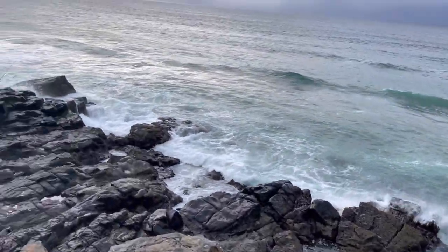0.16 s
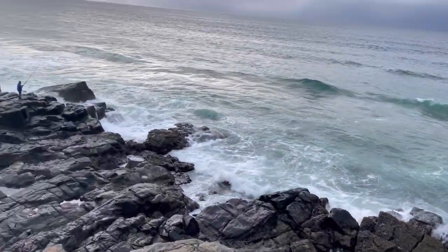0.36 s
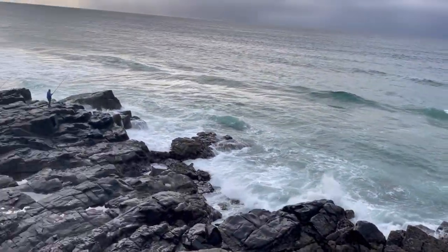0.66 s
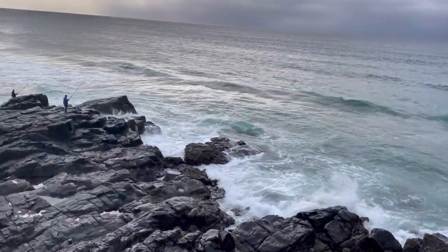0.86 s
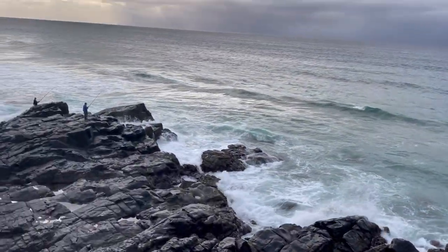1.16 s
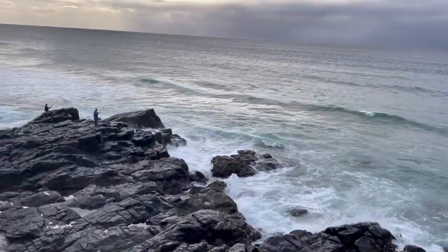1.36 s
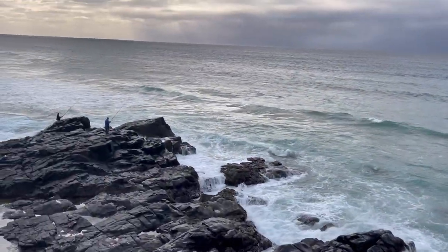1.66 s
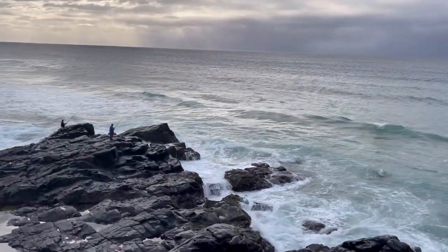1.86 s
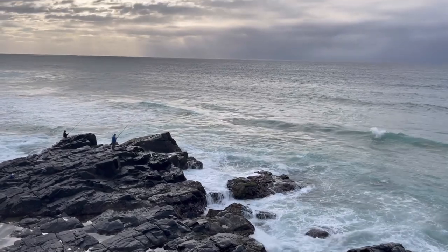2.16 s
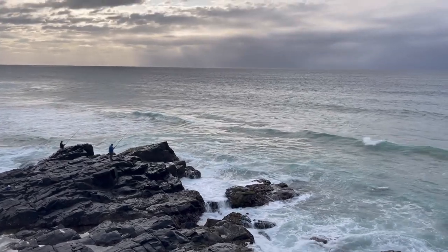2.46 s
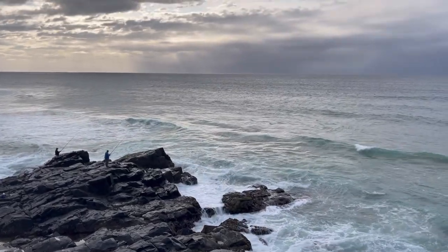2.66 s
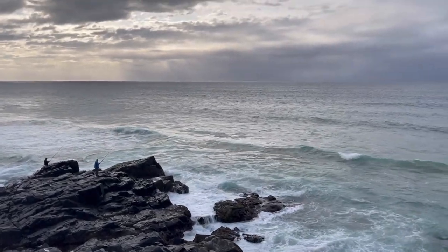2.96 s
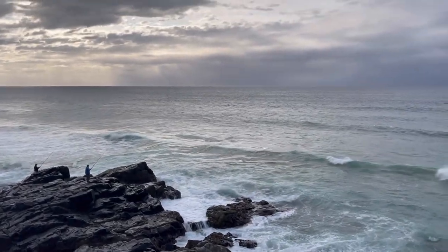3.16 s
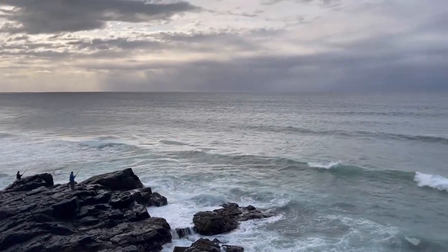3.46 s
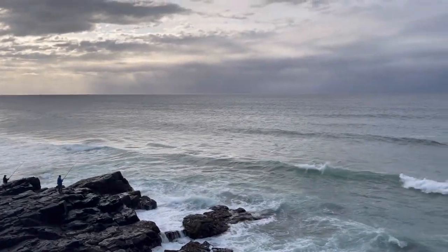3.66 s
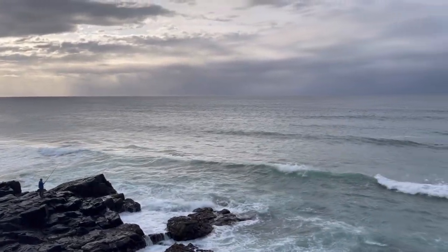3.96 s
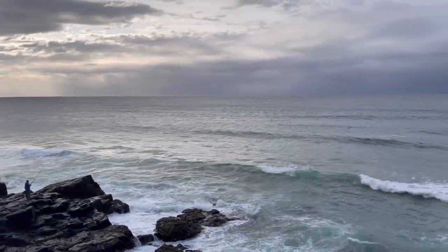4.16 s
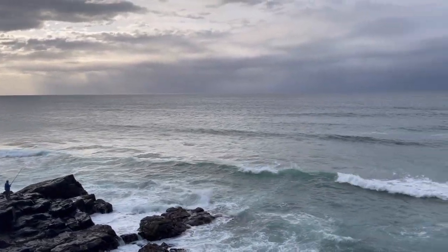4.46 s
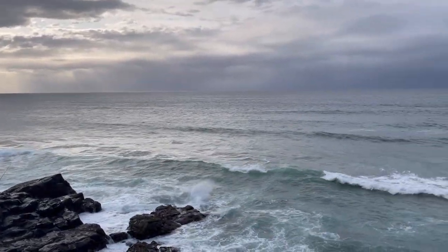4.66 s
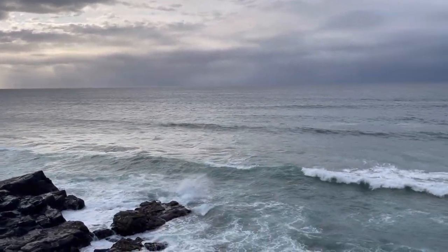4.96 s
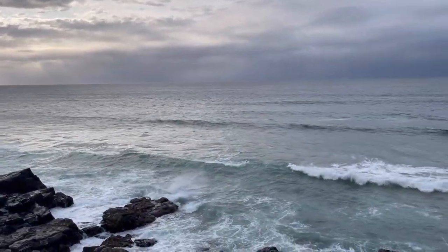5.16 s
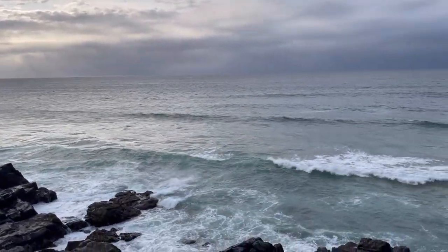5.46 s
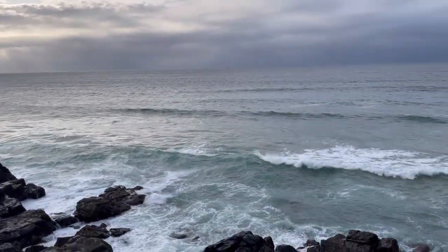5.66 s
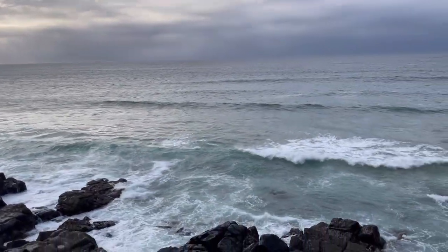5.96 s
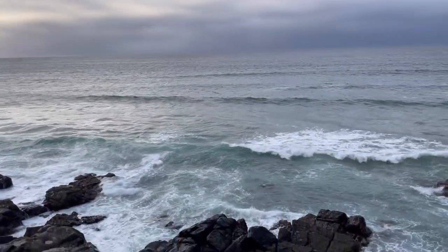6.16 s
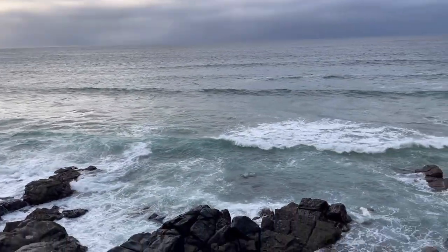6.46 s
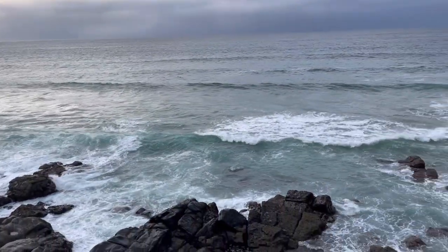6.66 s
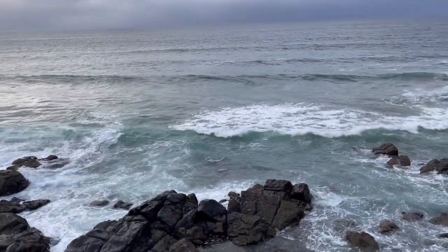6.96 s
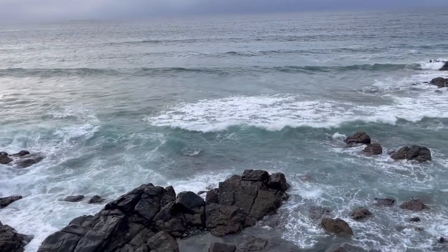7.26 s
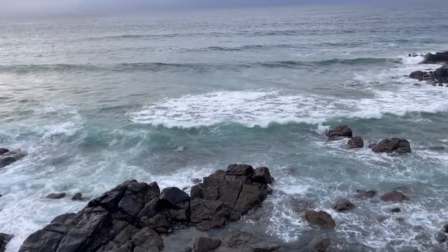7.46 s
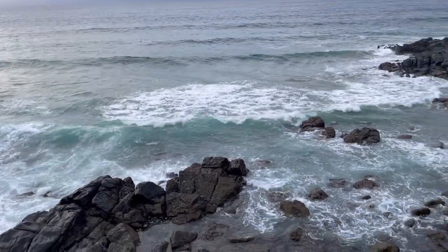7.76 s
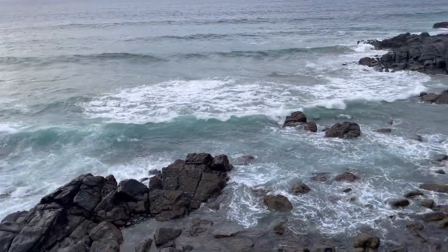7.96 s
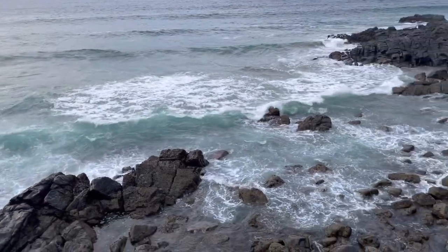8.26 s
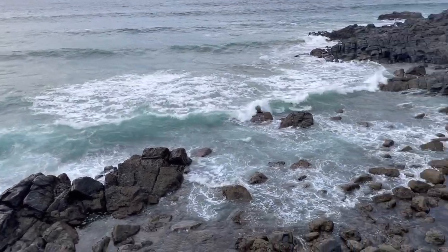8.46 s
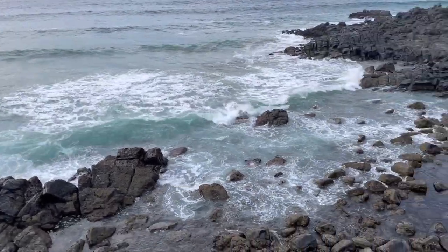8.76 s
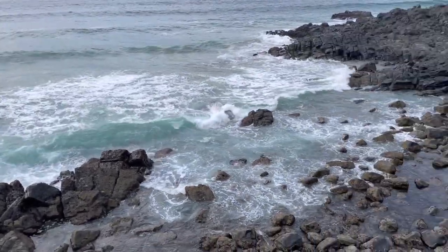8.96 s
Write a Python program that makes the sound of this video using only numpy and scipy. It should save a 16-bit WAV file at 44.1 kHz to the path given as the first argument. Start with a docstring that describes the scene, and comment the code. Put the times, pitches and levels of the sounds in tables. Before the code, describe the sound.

Steady surf roars and hisses over coastal rocks while wind thuds and rumbles against the microphone, rising after six seconds into dull, overloaded buffeting.

```python
"""Surf breaks and washes over a rocky shore, heard from the rocks above it: shaped noise in three bands.
Wind buffets the two microphone ports; each hard buffet is a short thud that falls in pitch, by dispersion.
Behind these, random eddies rumble, flutter and tear, swelling in gusts.
After six seconds the wind rises and overloads the recorder, whose limiter rounds off the surges."""
import sys
import numpy as np
from scipy import signal
from scipy.fft import rfft, irfft, next_fast_len
from scipy.io import wavfile
from scipy.ndimage import uniform_filter1d, minimum_filter1d

SR = 44100
rng = np.random.default_rng(int(sys.argv[2]) if len(sys.argv) > 2 else 0)


def wrap_up_sound(samples):
    """Save the sound to the file named by the first command line argument, as 16-bit audio."""
    columns = np.atleast_2d(samples).T
    # keep every value between -1 and 1, then stretch to whole-number steps
    tamed = np.clip(columns, -1, 1)
    steps = np.round(tamed * 32767).astype(np.int16)
    wavfile.write(sys.argv[1], SR, steps)


N = 402191
TIME = np.arange(N) / SR
# grid of the short-time spectra: 512-sample frames, 128 samples apart
FRAMES = N // 128 + 5
BIN_HZ = np.fft.rfftfreq(512, 1 / SR)


def surf():
    """Broadband bubble noise in three bands: the roar of breakers, the wash over the rocks, the fizz of foam."""
    # level of the breaking water: time_s, level_db
    roar_levels = [(0.0, -25.5), (3.1, -24), (4.2, -24.5), (5.0, -26.5), (5.6, -26.5), (6.2, -27.5)]
    # levels of the foam on the rocks: time_s, wash_db, fizz_db (the finest bubbles)
    foam_levels = [(0.0, -32.5, -38), (0.25, -31.5, -37), (0.65, -31, -37), (1.25, -33.5, -39.5),
                   (1.62, -32.0, -36), (2.45, -34.5, -40), (2.8, -33.5, -37.5), (3.6, -34.5, -41),
                   (4.15, -32.5, -39.5), (5.05, -34, -42), (5.45, -31.5, -39.0), (6.55, -32, -40),
                   (7.0, -33.5, -41.5), (8.1, -34.5, -42), (8.87, -32, -38.5), (9.12, -33, -40)]
    # relative spectra of the three bands: frequency_hz, density_db (per Hz)
    roar_colour = [(40, -16), (90, -2), (250, 0), (500, 0), (1000, -2.5), (1500, -5.5), (2100, -11),
                   (2900, -19), (4500, -36)]
    wash_colour = [(900, -12), (1600, 0), (2400, 1.5), (3300, 0), (4200, -2), (5300, -4), (5650, -8.5),
                   (6400, -6.5), (7400, -9), (9000, -24), (12000, -45)]
    fizz_colour = [(5000, -25), (7200, -5), (8000, -.5), (9800, 0), (11500, -1), (12300, -4),
                   (13200, -12.5), (14500, -21), (15700, -36)]
    roar_db, = follow(roar_levels, TIME)
    wash_db, fizz_db = follow(foam_levels, TIME)
    roar = water(roar_colour, roar_db, patch_db=1.35, flicker_db=0.5, ripple_db=1.0, bubble_db=3.0)
    wash = water(wash_colour, wash_db, patch_db=0.6, flicker_db=0.56, ripple_db=1.0, bubble_db=1.0)
    fizz = water(fizz_colour, fizz_db, patch_db=1.0, flicker_db=0.5, ripple_db=1.0, bubble_db=2.5)
    return roar + wash + fizz


def water(colour, level_db, patch_db, flicker_db, ripple_db, bubble_db):
    """Countless bubbles sum to Gaussian noise; random fields in time and frequency modulate its spectrum."""
    # likeness of the two channels: frequency_hz, coherence (0 to 1); the top treble is nearly the same in both
    channel_coherence = [(100, .7), (500, .4), (900, .2), (1700, .3), (2400, .55), (3100, .35), (4200, .62),
                         (5300, .5), (6400, .4), (7600, .78), (8700, .92), (11800, .72), (12800, .98)]
    # phase by which the left port leads: frequency_hz, lead_rad
    port_phase = [(100, 0), (500, 0), (1000, 1.7), (1700, 0), (2400, .6), (3000, 1.3), (4200, .7),
                  (5300, .7), (5770, -2), (6500, -.9), (7600, -2.6), (9800, -3.9), (12000, -5.2),
                  (12700, -6.2)]
    # balance of the ports: frequency_hz, left_minus_right_db
    port_balance = [(100, 15.5), (380, 2.5), (1000, -0.5), (2400, 0), (4400, 3), (8000, 0)]
    a, b, c, d = rng.standard_normal((4, FRAMES, len(BIN_HZ)))
    coherence = np.clip(read(channel_coherence, BIN_HZ), -1, 1)
    left = a + 1j * b
    right = coherence * left + np.sqrt(1 - coherence ** 2) * (c + 1j * d)
    right = right * np.exp(-1j * read(port_phase, BIN_HZ))
    lean = amp(read(port_balance, BIN_HZ) / 2)

    field_db = patch_db * patches(size=(30, 9))  # splashy patches
    field_db += flicker_db * patches(size=(7, 70))  # broadband flicker
    field_db += ripple_db * patches(size=(260, 4))  # slowly drifting colour
    field_db += bubble_db * patches(size=(7, 2))  # short rings of near bubbles
    spectra = np.array([left * lean, right / lean]) * amp(read(colour, BIN_HZ) + field_db)
    hiss = signal.istft(spectra, nperseg=512, noverlap=384, time_axis=1, freq_axis=2)[1][:, :N]
    return amp(level_db) * evened(hiss)


def patches(size):
    """Moving averages correlate white noise: a field of rms 1 whose blobs span size = (frames, bins)."""
    field = rng.standard_normal((FRAMES, len(BIN_HZ)))
    field = uniform_filter1d(field, size[0], 0)
    return evened(uniform_filter1d(field, size[1], 1))


def buffets():
    """Pressure impulses at both ports: dispersion and resonance turn a knock into a falling, ringing thud."""
    # hard buffets; the smaller the eddy, the higher its edge:
    # start_s, thud_db (before thud_trim_db), knock_db, edge_hz (upper edge of the knock), left_minus_right_db
    buffet_rows = [(0.138, -10, -24, 500, 0), (0.623, -9, -17, 600, 4), (0.807, -21, -7, 696, -2),
                   (0.875, -8.5, -18, 590, -5), (1.028, -12, -15, 600, 9), (1.075, -24, -18, 950, -8),
                   (1.086, -0.5, -9.5, 1190, 2), (1.132, -12, -20.5, 800, 0), (1.283, -8, -17, 1000, 0),
                   (1.308, -9, -15, 1300, 2), (1.356, -4, -17, 600, 1), (1.442, -11, -19, 800, -1),
                   (1.858, -21, -16, 900, 2), (2.218, -22, -15, 1400, -12), (2.276, -13, -18, 1000, -4),
                   (2.356, -4.5, -8.5, 750, 1), (2.447, -11, -17.5, 600, -1), (2.474, -5, -16.5, 750, 5),
                   (2.52, -15, -17, 1200, 1), (2.572, -7, -14.5, 850, 2), (2.82, -12, -12.5, 1300, 1),
                   (2.875, -15, -19, 550, 0), (2.905, -8, -24, 900, -4), (2.943, -19, -15, 650, 2),
                   (2.982, -14, -19.5, 700, 0), (3.016, -9.5, -21, 700, 1), (3.061, -15, -14, 1910, 2),
                   (3.192, -17, -36, 500, 0), (4.299, -14, -21, 700, 10), (4.427, -14, -12.5, 860, -3),
                   (4.44, -7, -21, 750, 16), (4.48, -22, -21, 750, 8), (4.605, -8, -18, 1190, 8),
                   (4.661, -11, -17, 750, 3), (4.738, -12, -19, 910, 7), (5.098, -15, -14.5, 750, 1),
                   (5.127, -15, -15.5, 1100, -1), (5.175, -7, -35, 750, 2), (5.299, -14, -17, 1500, 1),
                   (5.325, 3.5, 3, 1570, -1), (5.349, -1, -16, 650, 1), (5.854, -9, -16.5, 800, 4),
                   (5.919, -20, -10.5, 664, 6), (5.937, -14, -17, 650, 11), (5.959, -11, -27, 600, 0),
                   (6.028, -4, -18, 600, 6), (6.056, -15, -14, 650, 3), (6.162, -21, -14, 600, 2),
                   (6.215, 1, -17, 750, 3), (6.245, -16, -7.5, 1050, 7), (6.288, -1.5, -23, 500, -3),
                   (6.319, -10, -14, 650, -2), (6.337, 1, -6, 560, -1), (6.358, 0, -4, 550, 8),
                   (6.384, -2, -11, 900, -1), (6.435, -3, -9, 2100, -3), (6.469, 0, -20, 700, -6),
                   (6.506, 3.5, -9.5, 650, -2), (6.572, -7, -17, 910, 11), (6.633, -16, -12, 450, -4),
                   (6.648, -10, -8, 650, 5), (6.752, 1, -14, 600, 5), (6.817, -5, -17, 1500, 3),
                   (6.844, -1, -6.5, 806, -1), (6.875, -3, -13, 850, 4), (6.929, -10, -14, 1400, 1),
                   (6.961, -12, -13, 700, 1), (6.989, -14, -8, 1310, -1), (7.008, -5.5, -7, 1000, 2),
                   (7.049, -3, -3, 900, -5), (7.072, -16, -6.5, 1000, 0), (7.109, -3, -9.5, 1500, 5),
                   (7.145, -4.5, -13, 2500, 2), (7.161, -4, -1, 1490, 0), (7.185, -17, -9, 2400, -6),
                   (7.202, -1, 1, 1500, -6), (7.253, -15, -10.5, 2180, 2), (7.273, 0, -8, 1950, -4),
                   (7.296, -9, -15, 650, 0), (7.338, -27, -10, 750, 7), (7.37, -11, -6, 1080, 2),
                   (7.52, -2, -6, 800, 0), (7.544, -5, -20, 1600, -4), (7.599, -22, -6, 900, -8),
                   (7.612, -7, -9, 900, 13), (7.646, -6.5, -5.5, 1700, 3), (7.685, -25, -10.5, 700, 5),
                   (7.706, -12, -4.5, 1210, 8), (7.722, -12, -28, 500, 0), (7.788, -11, -4.5, 1050, 4),
                   (7.801, 0, -4.5, 1980, 5), (7.836, -22, -12, 620, 15), (7.848, -11, -7.5, 1590, 10),
                   (7.884, 0, -20, 700, 3), (7.897, -16, -15, 1200, 3), (7.936, -5, -7, 1190, 1),
                   (7.953, 1, -10, 790, 0), (8.017, -30, -9.5, 660, -2.5), (8.037, -23, -9.5, 910, 5),
                   (8.064, -14, -17, 1200, 9), (8.089, -15, -10.5, 1300, -1), (8.125, -9, -9.5, 850, 4),
                   (8.134, -5, -19, 700, 0), (8.159, -19, -14, 1100, 1), (8.188, -20, -10, 850, 3),
                   (8.229, -16, -9, 1400, 4), (8.259, -32, -9, 2000, 3), (8.278, -22, -6.5, 1050, 12),
                   (8.346, -19, -12.5, 1260, 0), (8.363, -27, -9, 1240, -1), (8.398, -7.5, -10, 1160, 7),
                   (8.441, -3.5, -19, 600, 2), (8.464, -21, -8, 2150, 5), (8.484, -20, -7.5, 1650, 9),
                   (8.514, -20, -3, 1600, 6), (8.577, -7, -12, 1100, 0), (8.617, -13, -13, 1700, 11),
                   (8.642, -13, -15, 1600, 5), (8.668, -6.5, -21, 1900, 5), (8.722, -12, -8, 940, 4),
                   (8.796, 2, -13, 1400, 3), (8.848, -15, -4, 2500, 5), (8.879, -16, -5, 1700, 4),
                   (8.946, -23, -14, 2000, 11), (8.989, -22, -15, 650, 6)]
    # relative spectrum of the thud: frequency_hz, density_db (per Hz)
    thud_colour = [(20, -45), (35, -11), (55, 1.5), (90, 4.5), (140, 3), (220, -3), (400, -63), (900, -79)]
    thud_trim_db = -1.0
    level_span_s = 0.01  # levels are taken over this length
    ring_strength, ring_hz, ring_width_hz = 1.0, 68.5, 38  # bass resonance of the microphone
    knock_low_hz, corner_power = 310, 0.5  # the lower corner rises with the smallness of the eddy
    crack = amp(-32)  # a faint crack reaches beyond the edge
    fringe, fringe_s, wake, wake_s = 0.051, 0.004, 0.014, 0.014  # strengths and decay times of the small eddies
    crossing_s = 0.00056  # longest delay between the ports
    pitch_scatter = 0.11  # spread of the natural log of the thud's pitch

    out = np.zeros((2, N))
    lead_s = 0.016  # room ahead of the impulse
    t = np.arange(4096) / SR - lead_s
    suction = -1. * signal.unit_impulse(len(t), round(lead_s * SR))
    unit = np.sqrt(level_span_s * SR / len(t))
    stir = fringe * np.exp(-abs(t) / fringe_s) + wake * (t > 0) * np.exp(-abs(t) / wake_s)
    for start_s, thud_db, knock_db, edge_hz, pan_db in buffet_rows:
        smallness = np.sqrt(edge_hz / 1000)
        corner_hz = knock_low_hz * smallness ** corner_power
        pitch = np.exp(pitch_scatter * rng.standard_normal())  # no two thuds are tuned alike

        def knock_gain(hz):
            """A band-pass that falls 6 dB an octave from the lower corner to the edge."""
            slope = hz ** 2 / np.sqrt(hz ** 6 + corner_hz ** 6)
            return slope * (1 / np.sqrt(1 + (hz / edge_hz) ** 7) + crack / (1 + (hz / edge_hz) ** 2))

        def thud_gain(hz):
            """A scaled spectrum with a resonance that rings on."""
            ring = 1 + ring_strength / (1 + 2j * (hz - ring_hz) / ring_width_hz)
            return amp(read(thud_colour, hz / pitch)) * ring

        small_eddies = smallness * stir * rng.standard_normal((2, len(t)))
        knocks = port(suction + small_eddies, knock_gain)
        thud = amp(thud_db + thud_trim_db) * evened(port(suction, thud_gain))
        late_s = crossing_s * rng.uniform(-0.99, 1)  # either port may come first
        for channel, side in enumerate((1, -1)):
            sound = thud + amp(knock_db + side * pan_db / 2) * evened(knocks[channel])
            first = round((start_s - lead_s + side * late_s / 2) * SR)
            part = out[channel, first:][:len(t)]
            part += unit * sound[:len(part)]
    return out


def wind():
    """Turbulent pressure by eddy size: large ones rumble, small ones flutter, the strongest flow tears at edges."""
    # steady wind before gusts are added: time_s, rumble_db (large eddies), flutter_db (small eddies)
    wind_levels = [(0.0, -21.5, -20.5), (0.5, -21.5, -21.5), (0.9, -20, -20), (1.6, -17, -21),
                   (2.4, -23.5, -24), (3.1, -20.5, -28), (3.8, -22.5, -26.5), (4.2, -27, -23.5),
                   (4.55, -17, -24), (5.0, -17, -26), (5.5, -17.5, -25.5), (5.85, -16, -21),
                   (6.35, -10, -12.5), (6.68, -12, -16), (7.2, -4, -10), (7.6, -7.5, -15.5),
                   (7.72, -6.5, -17.5), (8.1, -12, -14.5), (8.35, -15, -18.5), (8.85, -9.5, -12.5),
                   (9.12, -19, -15)]
    # which port faces the wind: time_s, left_minus_right_db
    wind_side = [(0.0, -1), (2.4, 0), (5.3, 0), (7.3, -0.5), (7.8, 5), (8.1, 0.5), (8.45, 4), (9.12, 2)]
    # relative spectra of the three eddy sizes: frequency_hz, density_db (per Hz)
    rumble_colour = [(15, -40), (28, -29), (40, -4), (52, -0.5), (68, 4.5), (95, -1), (130, -1.5),
                     (200, -11.5), (320, -20), (700, -98)]
    flutter_colour = [(25, -25), (42, 5), (70, 6.5), (160, 0), (250, 2.5), (450, 1), (650, -5), (900, -9.5),
                      (1400, -15.5), (2400, -75), (5000, -78)]
    tear_colour = [(30, -45), (200, -25), (500, 7.5), (750, 6), (1100, -1), (1500, -3.5), (2200, -12.5),
                   (3200, -24), (6000, -47)]
    rumble_db, flutter_db = follow(wind_levels, TIME)
    gust_rumble_db, gust_flutter_db = gusts()
    side_db, = follow(wind_side, TIME)
    # tearing is -20.5 dB at a steady flutter of -14.5 dB; it gains 2 dB per dB of flutter,
    # 1.56 per dB of gust and 1.16 per dB of turning the left port into the wind
    tear_db = -20.5 + 2 * (flutter_db + 14.5) + 1.56 * gust_flutter_db + 1.16 * side_db

    rumble = turbulence(rumble_colour, lump_db=5.5, lump_hz=24.3, share=0.6, eddies_per_s=60, hiss=0.5)
    flutter = turbulence(flutter_colour, lump_db=4.0, lump_hz=27.8, share=0.31, eddies_per_s=170, hiss=0.7)
    tear = turbulence(tear_colour, lump_db=4.0, lump_hz=44.7, share=0.046, eddies_per_s=320, hiss=0.71)
    large = amp(rumble_db + gust_rumble_db) * rumble
    small = amp(flutter_db + gust_flutter_db) * flutter + amp(tear_db) * tear
    # large eddies wrap around both ports; only the small ones favour the windward port
    return veer(large + small * amp(np.array([side_db, -side_db]) / 2))


def turbulence(colour, lump_db, lump_hz, share, eddies_per_s, hiss):
    """Random impulses, one per eddy, over fine pressure noise; they come in lumps, partly common to both ports."""
    lumps = pair(wobble(lump_hz), wobble(lump_hz), wobble(lump_hz), 0.47)
    lumps = 2 * np.tanh(lumps / 2)  # bounds the extremes
    eddies = rng.standard_normal((3, N)) * (rng.random((3, N)) < eddies_per_s / SR)
    flow = evened(eddies) + hiss * rng.standard_normal((3, N))
    sound = port(pair(*flow, share) * amp(lump_db * lumps), lambda hz: amp(read(colour, hz)))
    # the lumps shift energy only within the span of a gust
    return sound / np.sqrt(uniform_filter1d((sound ** 2).mean(0), size=4500) + 1e-20)


def gusts():
    """Level modulation in dB of rumble and flutter: each gust swells and dies away, with a short lull behind it."""
    # gusts: height_s (time of the height), length_s, rumble_rise_db, flutter_rise_db (lulls are added)
    gust_rows = [(0.165, 0.099, 8, -4), (0.626, 0.1, 8, 5.5), (0.727, 0.13, 2.5, 5), (1.036, 0.059, 4, 4.5),
                 (1.11, 0.14, 5, -3), (1.278, 0.14, 2, 2), (1.373, 0.28, 2, 2.5), (2.2, 0.29, 5.5, 7),
                 (2.264, 0.079, 1, 7), (2.385, 0.16, 6, -8), (2.485, 0.077, 6, 7), (2.555, 0.14, 13.5, 11),
                 (2.682, 0.071, 9, 7), (2.966, 0.092, 3, -5), (3.188, 0.098, 9, 6), (4.1, 0.052, 15, -3),
                 (4.338, 0.11, 11, 4), (4.444, 0.2, 8.5, 8.5), (4.607, 0.099, -1, 12.5),
                 (4.677, 0.071, 4, 10.5), (5.002, 0.12, -5, 3.5), (5.128, 0.38, 3.5, 8),
                 (5.329, 0.18, 5, 10.5), (5.706, 0.098, 6, 1.5), (6.034, 0.057, 8, 6.5),
                 (6.214, 0.13, 1, 3), (6.454, 0.044, -3, 4), (6.57, 0.1, 3, 2), (6.683, 0.034, 11, 3),
                 (6.736, 0.19, -6, 1), (6.867, 0.15, 1, 2), (7.008, 0.13, -14, 1.5), (7.156, 0.2, 2, 3.5),
                 (7.28, 0.071, -7, 2.5), (7.382, 0.092, -1, 1), (7.56, 0.26, 2, 4.5), (7.965, 0.052, 0, 6),
                 (8.538, 0.12, 1, 5.5), (8.64, 0.15, 0.5, 3.5), (8.9, 0.19, -1, 3.5)]
    lull_after_s, lull_s, lull_db = 0.021, 0.11, -2.5  # height of the lull after the gust's end, length, depth
    rise_db = np.zeros((2, N))
    for height_s, length_s, rumble_db, flutter_db in gust_rows:
        rise_db += np.outer([rumble_db, flutter_db], swell(height_s, length_s))
        rise_db += lull_db * swell(height_s + length_s / 2 + lull_after_s, lull_s)
    return rise_db


def swell(height_s, length_s):
    """A raised-cosine envelope of height 1 centred on height_s."""
    return np.cos(np.pi * np.clip((TIME - height_s) / length_s, -.5, .5)) ** 2


def veer(x, radians=0.98, rate_hz=2.5):
    """Opposed phase rotation by the analytic signal: the flow turns, so now one port leads and now the other."""
    turn = np.array([[1], [-1]]) * radians * wobble(rate_hz) / 2
    quadrature = signal.hilbert(x, next_fast_len(N, True))[:, :N].imag
    return x * np.cos(turn) - quadrature * np.sin(turn)


def port(x, gain, turns=2.039, knee_hz=70):
    """Dispersion at a port coloured by gain(hz): lows arrive later than highs, so a kick becomes a falling thud."""
    size = next_fast_len(x.shape[-1] + 4096, True)
    hz = np.fft.rfftfreq(size, 1 / SR)
    lag = np.exp(-2j * np.pi * turns * np.log(1 + hz / knee_hz))
    return irfft(rfft(x, size) * gain(hz) * lag, size)[..., :x.shape[-1]]


def pair(common, left, right, share):
    """Partial coherence: two channels with a share of their power in common."""
    share = np.clip(share, 0, 1)
    return np.sqrt(share) * common + np.sqrt(1 - share) * np.array([left, right])


def wobble(rate_hz):
    """Low-pass noise of rms 1: slow chance, up to about rate_hz."""
    coarse_s = np.arange(16384) * TIME[-1] / 16383
    hz = np.fft.rfftfreq(len(coarse_s), coarse_s[1])
    slow = irfft(rfft(rng.standard_normal(len(coarse_s))) / (1 + (hz / rate_hz) ** 2))
    return np.interp(TIME, coarse_s, evened(slow))


def amp(db):
    """Decibels to amplitude gain."""
    return 10 ** (np.asarray(db) / 20)


def evened(x):
    """Normalizes mean power: scales to rms 1."""
    return x / np.sqrt(np.mean(x ** 2) + 1e-20)


def read(points, hz):
    """Interpolates a spectrum linearly on a log-frequency axis."""
    f, value = np.transpose(points)
    return np.interp(np.log(hz + 1), np.log(f + 1), value)


def follow(rows, t):
    """Interpolates every column of a time curve linearly at the times t."""
    s, *columns = np.transpose(rows)
    return [np.interp(t, s, column) for column in columns]


def scene():
    """Superposition of pressures: the sea under the wind."""
    return surf() + buffets() + wind()


def record(dry):
    """Two-band limiting: surges are ridden down, their tops rounded, the hiss gently ducked; then a low-pass."""
    split_hz, ceiling_db, duck, edge_hz = 3600, 3.5, 0.12, 15400
    smooth = signal.firwin(41, min(split_hz, SR / 4), fs=SR)[None]
    low = signal.oaconvolve(dry, smooth, "same")
    ride = 1 / np.maximum(abs(low) / amp(ceiling_db), 1)
    ride = uniform_filter1d(minimum_filter1d(ride, size=400), size=400)
    held = low * ride
    rounding = (1 + abs(held) ** 12) ** (-1 / 12)
    # what is shaved off the bass stays in the bass band, so the overload sounds dull
    shaved = signal.oaconvolve(held * (1 - rounding), smooth, "same")
    shaved = shaved - uniform_filter1d(shaved, size=700)  # takes out its slowest pressure swings
    ducking = uniform_filter1d(ride * rounding, size=1500) ** (2 * duck)
    limited = held - shaved + (dry - low) * ducking
    band_limit = signal.firwin(511, edge_hz, window=("kaiser", 9), fs=SR)[None]
    return signal.oaconvolve(limited, band_limit, "same")


dry = scene()
out = record(dry)
wrap_up_sound(out)
```